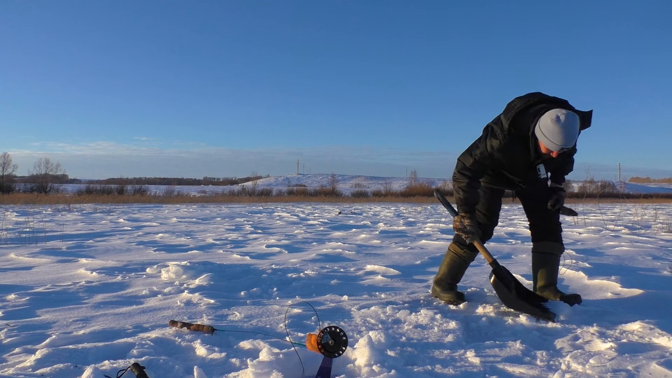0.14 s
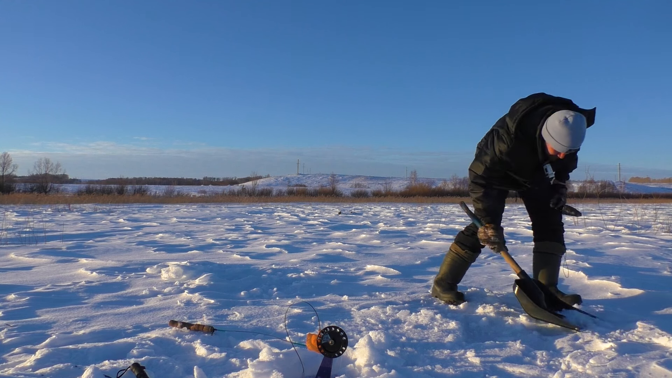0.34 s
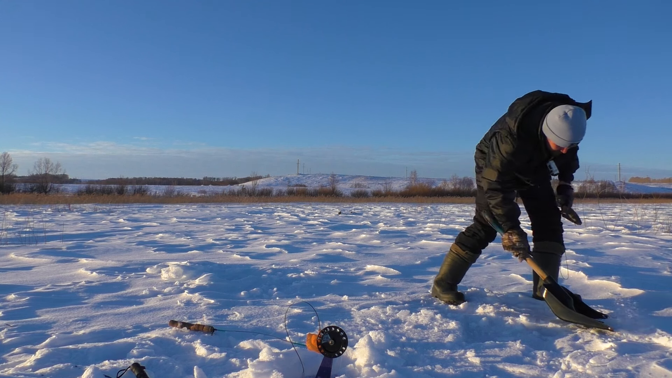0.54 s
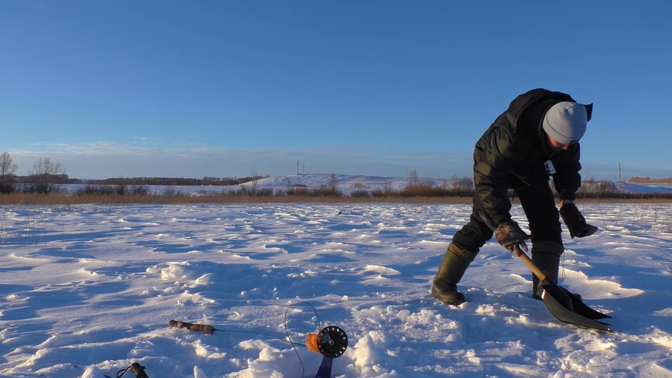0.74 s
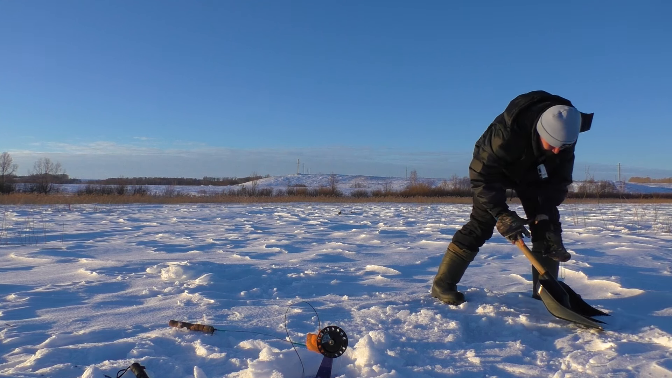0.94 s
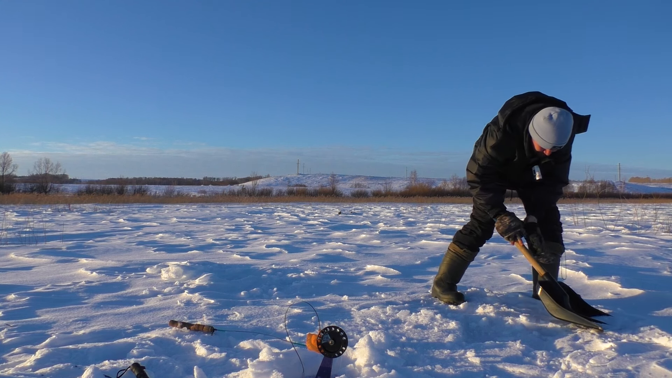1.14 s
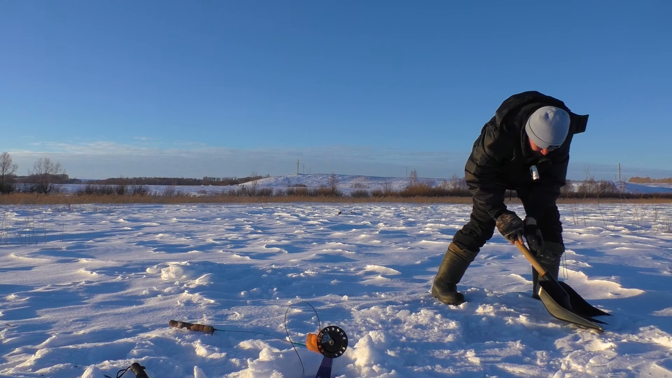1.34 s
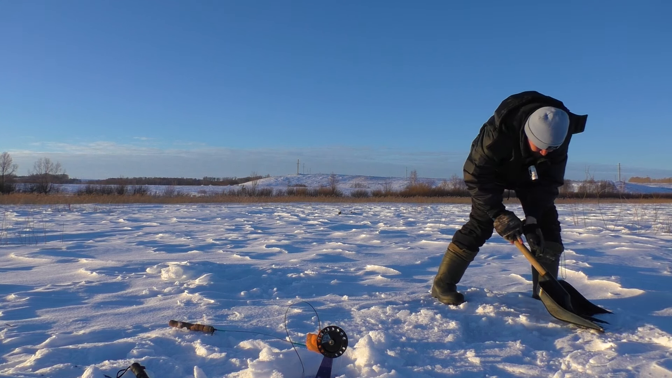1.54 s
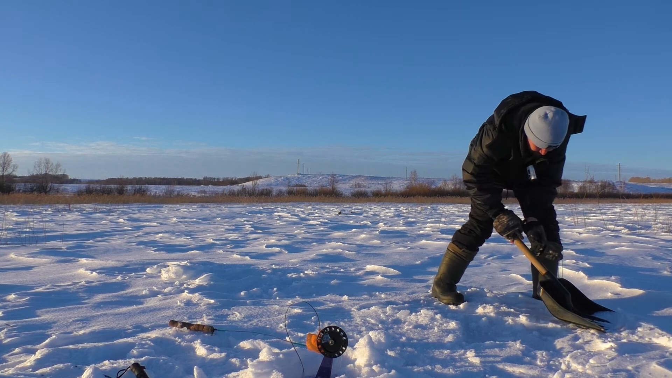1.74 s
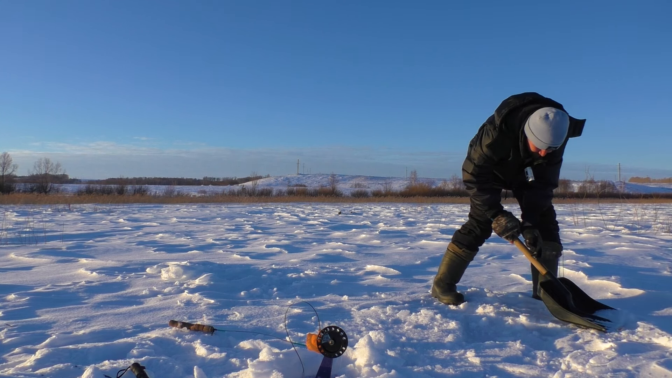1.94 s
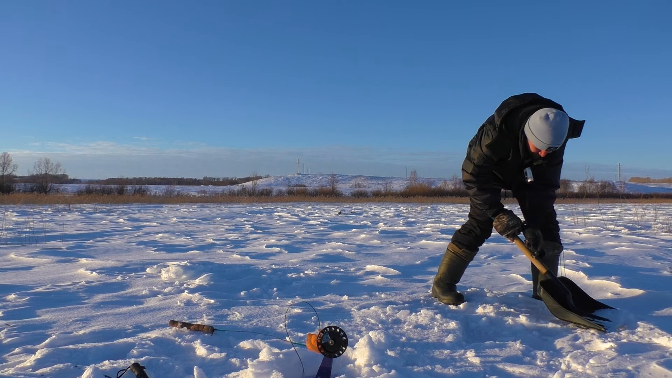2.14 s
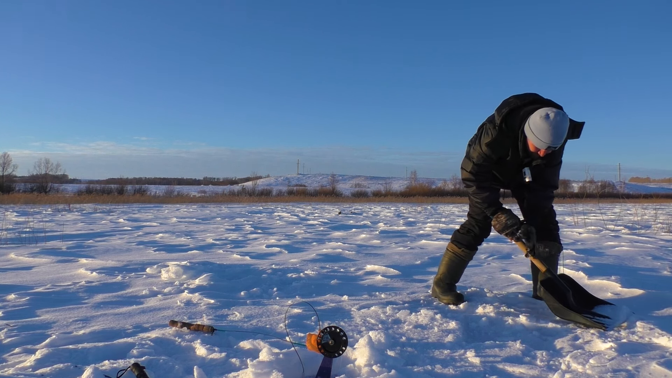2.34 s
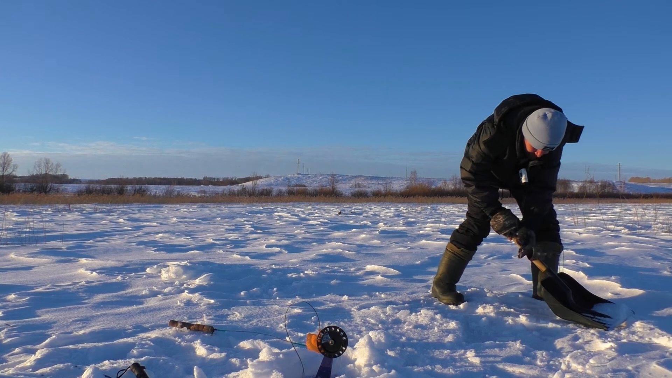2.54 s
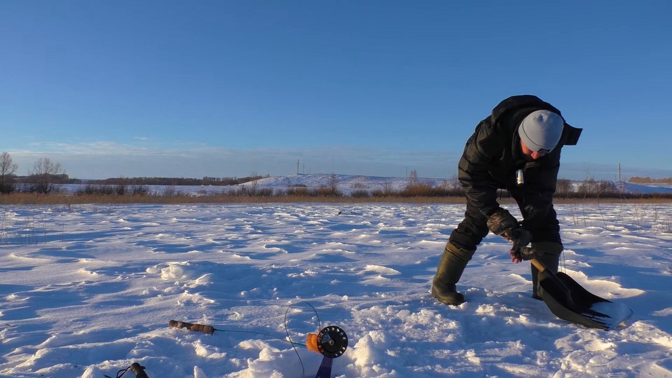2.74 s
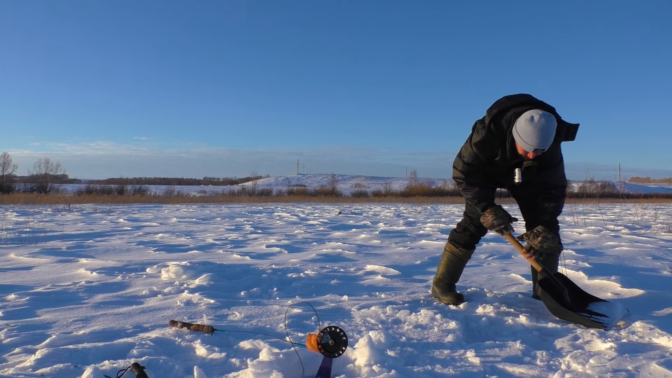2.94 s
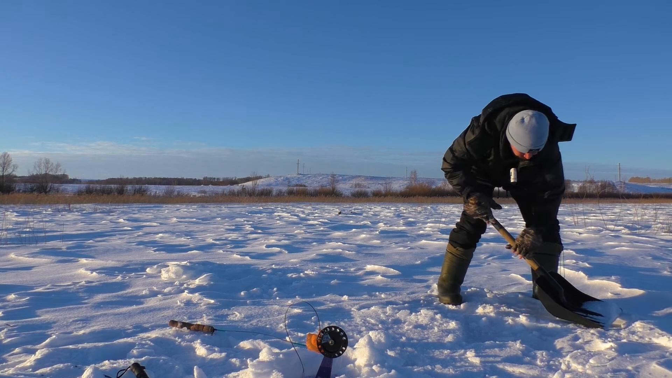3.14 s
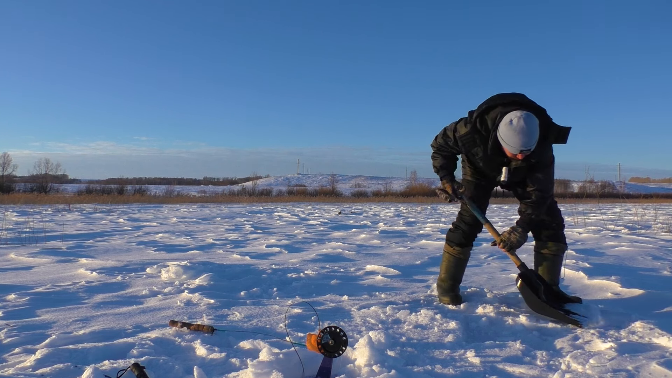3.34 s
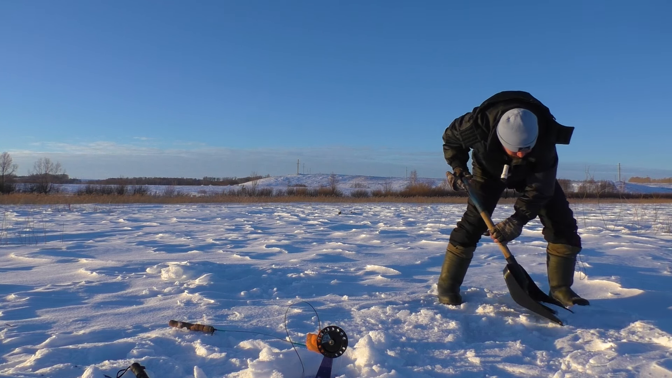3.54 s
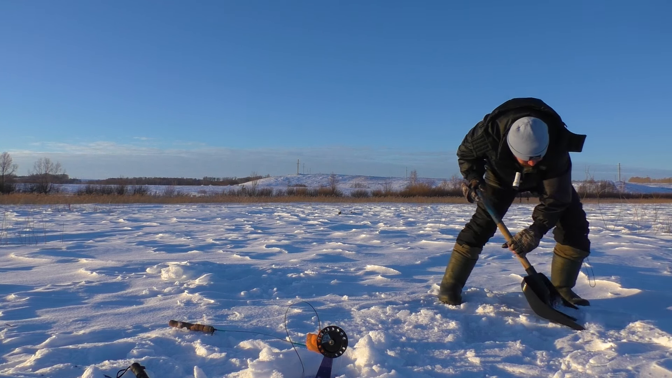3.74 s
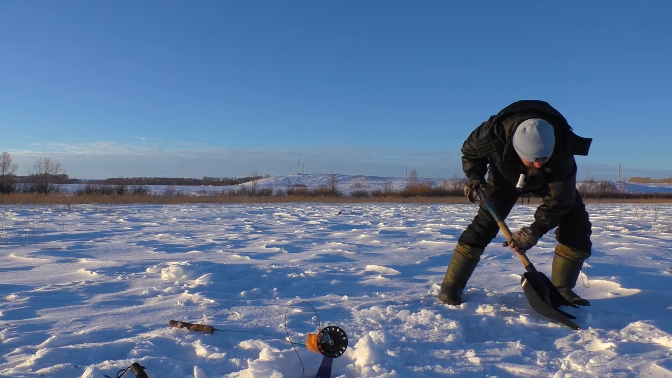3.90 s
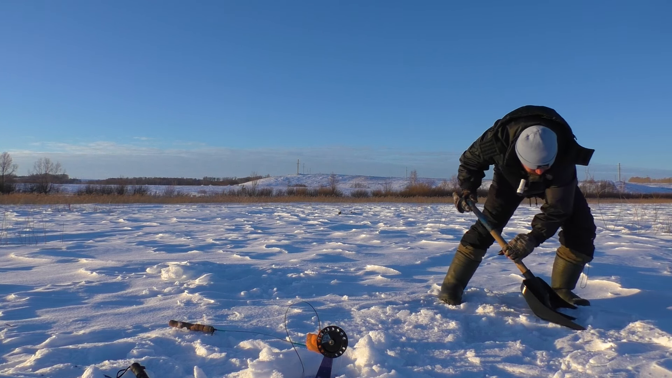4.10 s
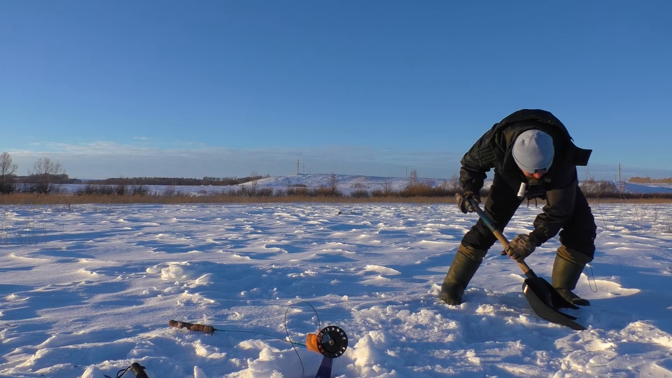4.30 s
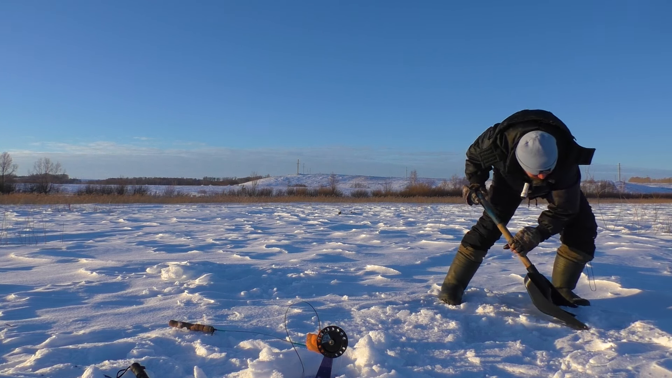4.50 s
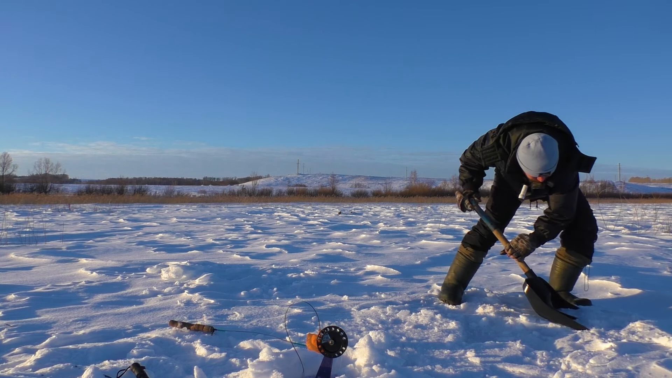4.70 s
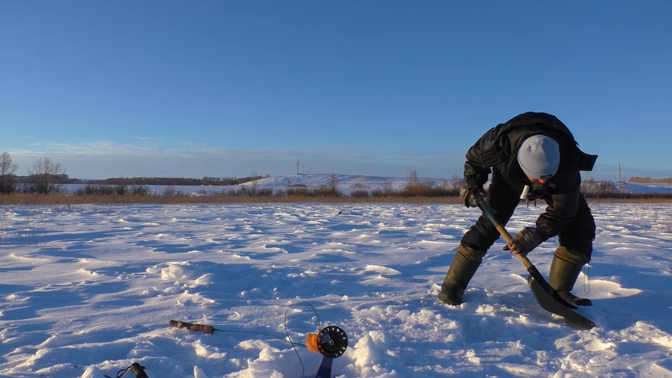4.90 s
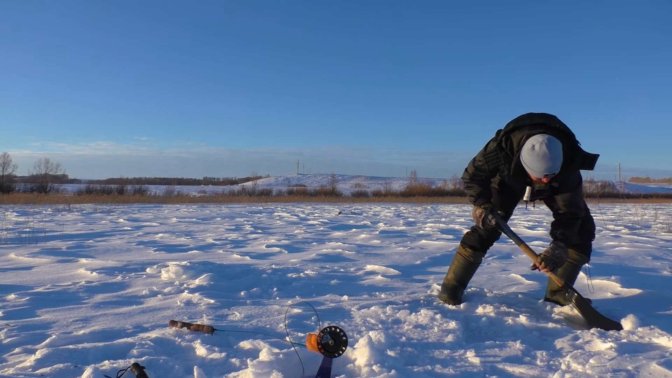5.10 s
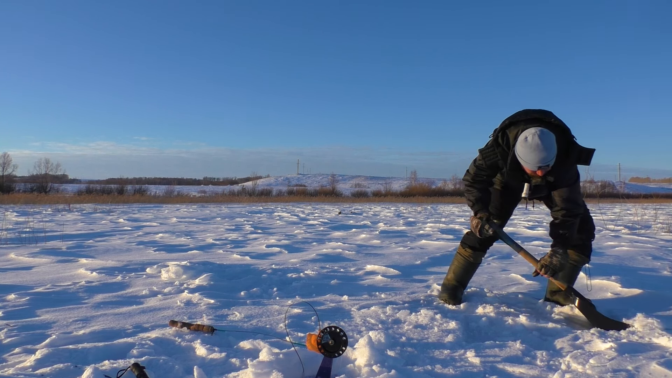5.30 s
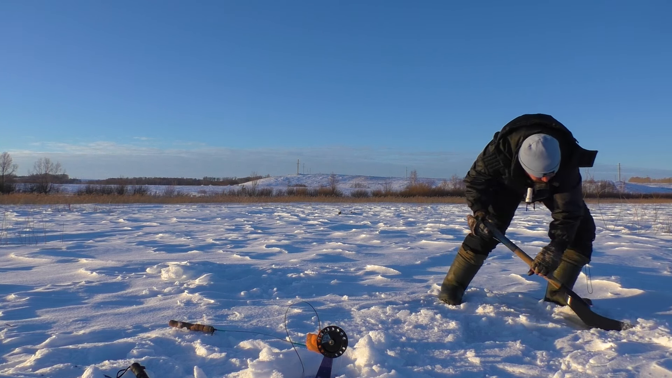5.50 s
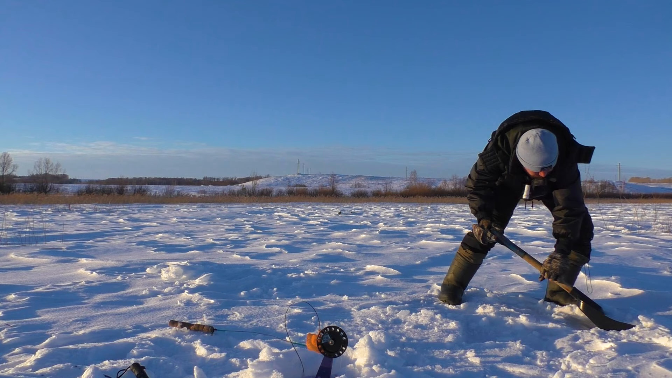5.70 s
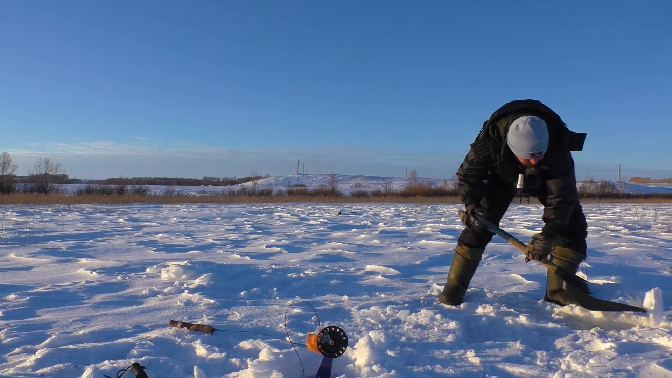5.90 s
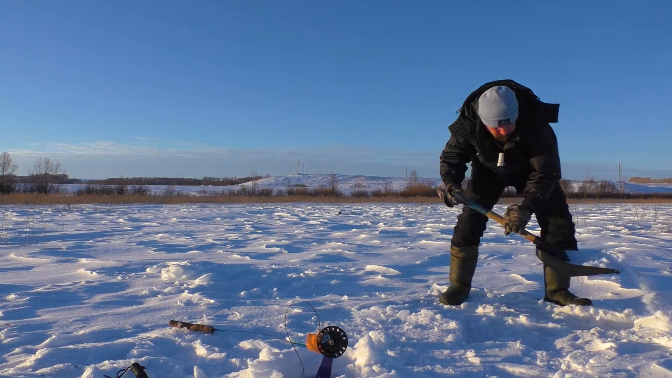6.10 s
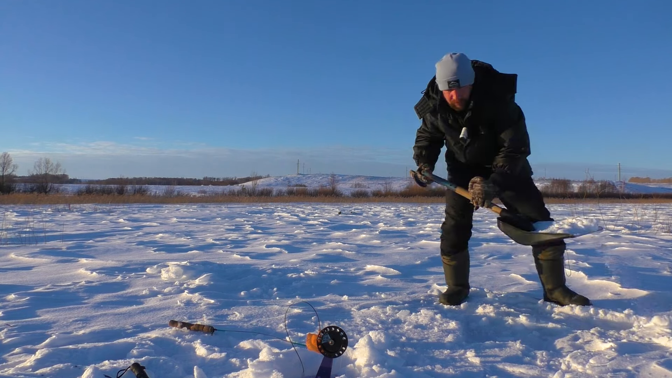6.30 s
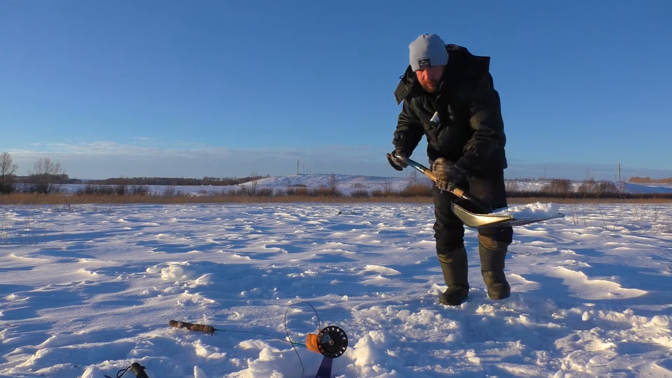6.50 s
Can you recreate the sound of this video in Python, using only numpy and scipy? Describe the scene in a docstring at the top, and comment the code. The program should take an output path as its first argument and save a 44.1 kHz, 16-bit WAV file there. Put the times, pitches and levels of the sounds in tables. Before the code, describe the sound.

A plastic shovel scrapes briefly into crusted snow, its blade booming and juddering. For a few seconds a padded jacket rustles, ice crumbs tick and light wind touches the microphone. Then comes a run of crunching chops and scrapes with hollow knocks, closed by one sharp snap. Packed snow pops dully at the end. It all happens a few steps away on a frozen lake, with no echo.

```python
"""A plastic shovel works crusted snow on a frozen lake, a few steps away, in open air with no echo.
It opens with a short scrape: the crust breaks in clumps of tiny fractures and the blade booms and judders.
For nearly three seconds a padded jacket rustles, ice crumbs tick and light wind touches the microphone.
Then comes a run of chops and scrapes, the scoop flexing and knocking, closed by one sharp snap.
Last, packed snow pops dully under boots or falling clods while the jacket rustles on."""
import sys
import numpy as np
from scipy import signal
from scipy.fft import rfft, irfft
from scipy.io import wavfile
from scipy.ndimage import uniform_filter1d

SR = 44100
rng = np.random.default_rng(int(sys.argv[2]) if len(sys.argv) > 2 else 0)


def persist_wave(psi):
    """Save psi, clipped to +-1, as 16-bit WAV."""
    counts = np.round(np.clip(psi, -1, 1) * 32767).astype(np.int16)
    wavfile.write(sys.argv[1], SR, np.atleast_2d(counts).T)


N = 288987
TIME = np.arange(N) / SR


def gain_of(db):
    """Amplitude ratio of a level in decibels."""
    return 10 ** (np.asarray(db) / 20)


def unit_rms(x):
    """Normalisation to unit mean power."""
    return x / np.sqrt(np.mean(x ** 2) + 1e-20)


def add(mix, start_s, sound):
    """Superposition: a sound joins the mix at its onset."""
    part = mix[max(round(start_s * SR), 0):][:len(sound)]
    part += sound[:len(part)]


def coloured(x, spectrum, size=4096):
    """Minimum-phase filtering by (frequency_hz, level_db) points: causal, so attacks stay sharp."""
    hz, db = np.transpose(spectrum)
    bins_hz = abs(np.fft.fftfreq(size, 1 / SR))
    log_gain = np.log(gain_of(np.interp(np.log(bins_hz + 1), np.log(hz + 1), db)))
    taps = np.fft.ifft(np.exp(np.conj(signal.hilbert(log_gain)))).real[:size // 2]
    return signal.oaconvolve(x, taps)[:len(x)]


def wander(hz):
    """Low-pass noise: a random drift of rms 1, up to about hz."""
    bins_hz = np.fft.rfftfreq(N, 1 / SR)
    return unit_rms(irfft(rfft(rng.standard_normal(N)) / np.sqrt(1 + (bins_hz / hz) ** 4), N))


def swells(table, column, rest_db):
    """Power summation of rounded swells over a resting level; each length is a width at half height."""
    t = TIME[::32]
    steepness = 2.64  # 2 is a bell; higher has a flatter top
    power = gain_of(rest_db) ** 2
    for row in table:
        middle_s, length_s = row[:2]
        halvings = np.minimum(abs(2 * (t - middle_s) / length_s) ** steepness, 20)
        power = power + (gain_of(row[column]) * .5 ** halvings) ** 2
    return np.interp(TIME, t, np.sqrt(power))


def grains(spectrum, per_s, spread_db, clumps, patchy_db):
    """Shot noise as mid and side: random impulses, each with its own size, place and passing colour."""
    # how unlike the two channels hear a grain: frequency_hz, side_to_mid_db
    width = [(25, -28), (70, -7), (250, -22), (600, -13), (1200, -6.5), (4000, -9), (8000, -11.5),
             (12000, -13)]
    sizes = gain_of(spread_db * np.minimum(rng.exponential(1, N), 4))
    impulses = sizes * rng.choice([-1, 1], N) * (rng.random(N) < per_s / SR) * clumps
    frames = signal.stft(np.array([impulses, impulses * rng.standard_normal(N)]), nperseg=256)[2]
    patches = uniform_filter1d(rng.standard_normal(frames.shape[1:]), size=4, axis=0)
    patches = unit_rms(uniform_filter1d(patches, size=7, axis=1))
    mid, side = signal.istft(frames * gain_of(patchy_db * patches), nperseg=256)[1][:, :N]
    mid, side = coloured(mid, spectrum), coloured(coloured(side, spectrum), width)
    return np.array([mid, side]) / np.std(mid)


def open_air():
    """Turbulent pressure: wind buffets the microphone over a faint even hiss."""
    # gusts: middle_s, length_s, level_db
    gusts = [(0.78, 0.085, -33.5), (0.895, 0.055, -27.5), (0.99, 0.07, -37), (1.172, 0.034, -31.5),
             (1.27, 0.098, -32), (1.405, 0.074, -33), (1.83, 0.24, -34), (2.0, 0.075, -32.5),
             (2.26, 0.068, -33.5), (3.38, 0.24, -33), (3.955, 0.06, -27.5), (6.41, 0.18, -36)]
    # spectra of the buffets and the hiss: frequency_hz, level_db
    wind_spectrum = [(10, -8), (32, -1.5), (60, -5), (110, -12), (200, -42), (500, -37), (2000, -68)]
    hiss_spectrum = [(24, -29), (40, -5), (577, -11.5), (778, -11), (1220, -21.5), (1600, -21.5),
                     (2330, -21.5), (6480, -27.5), (9180, -27.5), (15500, -33)]
    strength = swells(gusts, 2, rest_db=-46) * gain_of(3.5 * wander(hz=9.4))
    wind = grains(wind_spectrum, per_s=10000, spread_db=-0.5, clumps=1, patchy_db=-0.5)
    hiss = grains(hiss_spectrum, per_s=30000, spread_db=3, clumps=1, patchy_db=3)
    return wind * strength + gain_of(-43) * hiss


def rustle():
    """Friction and fracture: each movement swishes the jacket, crumbles loose snow and makes ice tick."""
    # movements of the body: middle_s, length_s, swish_db, crumble_db
    movements = [ (0.21, 0.043, -34.5, -31.5), (0.31, 0.13, -34, -32), (0.55, 0.2, -32.5, -40.5),
                 (0.74, 0.19, -39.5, -38.5), (0.96, 0.21, -33.5, -36), (1.13, 0.18, -45.5, -39.5),
                 (1.45, 0.19, -46, -40.5), (1.63, 0.15, -49.5, -44), (1.86, 0.18, -40, -42),
                 (1.97, 0.098, -35, -33.5), (2.11, 0.13, -42.5, -42), (2.33, 0.17, -44, -39),
                 (2.45, 0.078, -42.5, -35), (2.6, 0.3, -42.5, -39.5), (2.68, 0.12, -37, -43),
                 (3.03, 0.24, -42, -38.5), (3.18, 0.21, -35.5, -31.5), (3.31, 0.091, -33.5, -30),
                 (3.44, 0.18, -34, -32), (3.92, 0.047, -34, -26.5), (4.0, 0.11, -35.5, -32.5),
                 (4.49, 0.058, -37.5, -34), (4.6, 0.1, -38, -39.5), (5.51, 0.098, -45, -39),
                 (5.815, 0.071, -42, -38), (5.895, 0.049, -30.5, -36.5), (5.965, 0.079, -37.5, -31.5),
                 (6.06, 0.11, -35.5, -35.5), (6.2, 0.11, -37.5, -37), (6.32, 0.13, -39.5, -33.5),
                 (6.52, 0.15, -44, -39), ]
    # spectra of cloth (also used for the ticks) and loose snow: frequency_hz, level_db
    jacket = [(500, -3.5), (1300, -3.5), (1800, 1), (2300, 2.5), (3000, 1.5), (3900, 1.5), (5500, 0.5),
              (8000, 0), (10500, -4), (13000, -9.5), (16000, -14)]
    loose_snow = [(60, 0.5), (140, -3), (230, 6.5), (400, 1.5), (650, -3.5), (1000, -3), (1600, -8.5),
                  (3500, -33.5)]
    clumps = gain_of(1.1 * wander(hz=59.56))
    swish = grains(jacket, per_s=14000, spread_db=3.5, clumps=clumps, patchy_db=2)
    ticks = grains(jacket, per_s=90, spread_db=3, clumps=1, patchy_db=2.5)
    crumbs = grains(loose_snow, per_s=900, spread_db=2, clumps=clumps, patchy_db=2)
    bright = (swish + gain_of(-11.5) * ticks) * swells(movements, 2, rest_db=-54)
    return bright + crumbs * swells(movements, 3, rest_db=-51)


def chafing():
    """Sliding friction: stiff ribbed cloth drags over itself in brief swells of fine grains."""
    # rubs: middle_s, length_s, level_db
    rubs = [(1.13, 0.085, -40.5), (1.241, 0.021, -35.5), (1.39, 0.16, -42.5), (1.452, 0.047, -38.5),
            (1.486, 0.037, -38.5), (1.51, 0.029, -39), (1.588, 0.1, -43), (1.672, 0.06, -39),
            (2.29, 0.32, -42), (2.44, 0.096, -38)]
    # spectrum of the ribbed cloth: frequency_hz, level_db
    fabric = [(1500, -19), (2280, 3), (3100, -29), (5000, -10.5), (8200, 0), (9700, -5), (11000, -10),
              (15500, -17)]
    envelope = np.zeros(N)
    for middle_s, length_s, db in rubs:
        add(envelope, middle_s - length_s / 2, gain_of(db) * np.hanning(int(length_s * SR)))
    return envelope * grains(fabric, per_s=5900, spread_db=4.5, clumps=1, patchy_db=0.5)


def snow_pops():
    """Heavily damped oscillation: packed snow pops under a boot or a falling clod."""
    # pops: start_s, level_db, pitch_hz
    pops = [(0.787, -25, 476), (1.337, -25.5, 934), (1.472, -18, 476), (3.924, -10.5, 533),
            (5.938, -21.5, 920), (6.235, -15.5, 730), (6.272, -20, 902), (6.29, -14, 525),
            (6.313, -12.5, 730), (6.325, -15, 646), (6.368, -20, 450), (6.385, -18, 460)]
    out, t = np.zeros(N), np.arange(SR // 25) / SR
    for start_s, db, hz in pops:
        pop = np.sin(2 * np.pi * hz * t) * np.exp(-t / 0.0013)
        low_push = 0.32 * np.sin(2 * np.pi * 0.36 * hz * t) * np.exp(-t / 0.0027)
        onset = 1 - np.exp(-t / 0.00018)
        add(out, start_s, gain_of(db) * (pop + low_push) * onset)
    return out


def friction_bands():
    """Noise-driven resonance: sliding snow or cloth sings in a rough band that glides with the load."""
    # resonances: start_s, end_s, first_hz, last_hz, width_hz, level_db
    bands = [(0, 0.077, 2790, 2810, 218, -25.5), (0, 0.08, 945, 968, 120, -34),
             (0, 0.08, 344.5, 330, 60, -30), (0, 0.074, 12500, 12400, 1800, -40),
             (0.448, 0.494, 12400, 12500, 1800, -39), (0.347, 0.414, 5350, 5360, 904, -29),
             (0.349, 0.393, 562, 420, 60, -29.5), (0.398, 0.418, 608, 520, 60, -23),
             (0.416, 0.443, 410, 340, 60, -26), (0.363, 0.423, 1020, 1120, 160, -32.5),
             (0.447, 0.492, 4640, 4610, 350, -27.5), (0.446, 0.487, 6720, 6740, 900, -25),
             (0.477, 0.68, 3960, 3970, 700, -46), (2.635, 2.737, 3730, 3690, 600, -39),
             (3.303, 3.377, 2910, 2550, 900, -36), (3.49, 3.519, 440, 487, 30, -24),
             (3.545, 3.59, 462, 494, 30, -27.5), (3.648, 3.67, 990, 1000, 60, -27),
             (3.651, 3.747, 368, 290, 60, -21.5), (3.672, 3.712, 488, 560, 30, -24.5),
             (3.715, 3.799, 807, 914, 70, -28), (3.637, 3.7, 2550, 2426, 350, -32.5),
             (3.641, 3.786, 3450, 3540, 300, -35), (3.622, 3.685, 5710, 5800, 1000, -31),
             (4.033, 4.111, 125, 248, 55, -26.5), (4.085, 4.201, 2605, 2430, 381, -26),
             (4.09, 4.205, 1130, 1090, 170.8, -25.5), (4.095, 4.186, 638, 614, 69.7, -28.5),
             (4.066, 4.192, 3800, 3650, 500, -28.5), (4.366, 4.427, 880, 900, 119, -34),
             (4.351, 4.46, 3585, 3630, 540, -26.5), (4.373, 4.425, 420, 378, 30, -23),
             (4.752, 4.768, 2770, 2900, 181.6, -29), (5.104, 5.192, 2770, 2780, 150, -27.5),
             (5.202, 5.3, 6900, 7100, 1300, -33), (5.917, 6.125, 992, 1050, 300, -41.5),
             (6.146, 6.246, 946, 965, 330, -40.5), (6.462, 6.553, 1870, 1860, 260, -44.5),
             (6.465, 6.552, 3780, 4300, 450, -44.5)]
    out = np.zeros(N)
    drift = wander(hz=25)
    for start_s, end_s, first_hz, last_hz, width_hz, db in bands:
        count = int((end_s - start_s) * SR)
        pole = np.exp(-2 * np.pi * width_hz / SR)
        noise = rng.standard_normal((2, N // 8))
        quadrature = signal.lfilter([1], [1, -2 * pole, pole * pole], noise)[:, -count:]
        quadrature /= np.hypot(*quadrature) ** 0.26  # friction holds the strength fairly even
        waver = 1 + 0.0117 * np.roll(drift, -int(start_s * SR))[:count]
        phase = 2 * np.pi * np.cumsum(np.linspace(first_hz, last_hz, count) * waver) / SR
        tone = quadrature[0] * np.cos(phase) + quadrature[1] * np.sin(phase)
        add(out, start_s, gain_of(db) * unit_rms(tone * signal.windows.tukey(count, .5)))
    return out


def blade_ring(damping, detune, soft_hz):
    """Modal decay: the modes shift with the point of contact, and a soft blow misses the high ones."""
    # modes of the blade: pitch_hz, level_db, t60_s (at a damping of 1)
    modes = [(329, 8.5, 0.033), (946, 12.5, 0.01), (1510, 3.5, 0.028), (2360, 8.5, 0.015),
             (2900, 1, 0.0082), (3600, 10, 0.0039), (5610, 8, 0.032), (6900, 7, 0.026), (8900, 9, .02)]
    t = np.arange(SR // 16) / SR
    hz, db, t60_s = np.transpose(modes)[:, :, None]
    hz = hz * (1 + detune * rng.standard_normal(hz.shape))
    strength = gain_of(db) / (1 + (hz / soft_hz) ** 4) * rng.choice([-1, 1], hz.shape)
    decay = np.exp(-np.log(1000) * damping * t / t60_s)
    sound = (strength * decay * np.sin(2 * np.pi * hz * t)).sum(0)
    return sound / abs(sound).max()


def judder():
    """Stick-slip motion: uneven slips ring the blade at a gliding rate."""
    # runs of slips: start_s, end_s, peak_db, first_rate_hz, last_rate_hz
    runs = [(0.0, 0.077, -12, 167, 178), (0.123, 0.139, -8.5, 232, 186), (0.382, 0.4, -13.5, 103, 140),
            (4.1, 4.189, -15.5, 193, 100), (4.722, 4.736, -13.5, 220, 150), (4.803, 4.823, -25, 220, 81),
            (5.093, 5.176, -10.5, 217, 150)]
    out = np.zeros(N)
    for start_s, end_s, db, first_hz, last_hz in runs:
        cycles = np.cumsum(np.linspace(first_hz, last_hz, int((end_s - start_s) * SR))) / SR
        slips_s = np.flatnonzero(np.diff(np.floor(cycles), prepend=-1)) / SR
        for slip_s, (late, size) in zip(slips_s, rng.standard_normal((len(slips_s), 2))):
            ring = blade_ring(damping=1.3, detune=0.064, soft_hz=4240)
            add(out, start_s + slip_s + 0.00077 * late, gain_of(db + 0.59 * size) * ring)
    return out


def snaps():
    """Brittle fracture: a hard crumb cracks, knocks and rings the blade; a dull crack rings it dully."""
    # cracks: start_s, peak_db, treble_db, knock_db (the last two shape the spectrum)
    cracks = [(0.075, -8.5, 12, -25), (0.108, -8, -8, 6), (0.85, -20, -13, -4), (1.172, -23, 4, -24),
              (1.275, -23.5, -19, -10), (1.7235, -22.5, 6, -21), (1.7647, -20, 2, -28),
              (2.278, -20.5, -15, -15), (2.492, -14.5, -30, -5), (3.062, -16, -25, -20),
              (3.069, -13.5, 10, -14), (3.563, -8, -14, -12), (3.853, -10.5, -38, 19),
              (3.875, -23, -6, -26), (3.89, -16, -10, -31), (3.939, -9, 4, -26), (4.183, -6, -2, -13),
              (4.193, -7.5, -6, 2), (4.205, -5.5, -3, -4), (4.668, -6, -6, -7), (4.736, -9.5, -14, 4),
              (4.754, -6, 1, -25), (4.799, -6, -8, -4), (4.8161, -12, -6, -21), (4.8191, -5.5, -18, -5.5),
              (4.828, -8, -8, -24), (4.984, -19.5, -34, -16), (5.335, -15, -10, -12),
              (5.354, -8.5, -14, -7), (5.368, -13.5, -34, -16), (5.4827, -14.5, -12, -22),
              (5.8335, -1, -12, -16.5), (6.3468, -13.5, -28, -8)]
    out, t = np.zeros(N), np.arange(SR // 16) / SR
    for start_s, db, treble_db, knock_db in cracks:
        burst = rng.standard_normal(len(t)) * np.exp(-t / 0.0011)
        burst[0] += 3  # the first break is the sharpest
        lows = [(100, knock_db), (350, knock_db + 12.5), (700, knock_db + 6), (1400, knock_db + 5.5)]
        highs = [(2200, -4), (4200, -4.5), (8000, treble_db), (15000, treble_db - 21)]
        crack = coloured(burst, lows + highs)
        ring = blade_ring(damping=0.6, detune=0.01, soft_hz=12000 * gain_of(0.14 * treble_db))
        sound = crack / abs(crack).max() + gain_of(-7 + .5 * knock_db) * ring
        add(out, start_s, gain_of(db) * sound / abs(sound).max())
    return out


def thumps():
    """Damped flexure: as blade or boot breaks through, the snow-loaded scoop bends and its hollow rings."""
    # blows: start_s, level_db, pitch_hz, hollow_relative_db
    blows = [(0.107, -15.5, 362, 4), (0.131, -12, 258, 5), (0.3923, -11, 343, -11),
             (0.4122, -7.5, 308, -14), (2.233, -23, 140, -30), (3.491, -10, 323, -8), (3.504, -9, 315, -5),
             (3.62, -9.5, 198, -9), (3.727, -10, 292, -5), (3.785, -13, 264, -7), (3.843, -16, 203, -10),
             (4.087, -10, 186.3, -14), (4.242, -7.5, 260, -11), (4.25, -21, 316, -6),
             (4.283, -10.5, 330, -13), (4.366, -16, 255, 1), (4.385, -11.5, 246, -2), (4.402, -12, 253, 0),
             (4.638, -7.5, 196, -19), (4.65, -16, 260, -12), (4.731, -10, 224, -15), (4.754, -14, 268, -21),
             (4.801, -12, 321, -4), (4.82, -24, 267, 0), (5.089, -2.5, 230.7, -22), (5.109, -11.5, 303, 3),
             (5.13, -5, 267.5, -20), (5.301, -22, 330, -14), (5.346, -21, 410, -10), (5.408, -22, 260, 5),
             (5.835, -21, 279, -20), (6.319, -21, 288, -17)]
    hollow_hz, hollow_decay_s = 894, 0.0035
    out, t = np.zeros(N), np.arange(SR // 10) / SR
    for start_s, db, hz, hollow_db in blows:
        overtone_shift, hollow_shift = rng.uniform(-1.04, 1, 2)
        overtone_hz = hz * (1.615 + 0.13 * overtone_shift)
        flex = (np.sin(2 * np.pi * hz * t) + 0.37 * np.sin(2 * np.pi * overtone_hz * t)) * np.exp(-t / 0.008)
        hollow = np.sin(2 * np.pi * hollow_hz * (1 + 0.078 * hollow_shift) * t)
        hollow *= gain_of(hollow_db) * np.exp(-t / hollow_decay_s)
        onset = 1 - np.exp(-t / 0.0014)
        add(out, start_s, gain_of(db) * (flex + hollow) * onset)
    return out


def push_envelopes():
    """Loading and release: crunch, powder and boom build, hold and let go with each push of the blade."""
    # pushes: start_s, attack_s, length_s, release_s, crunch_db, boom_db, powder_relative_db
    pushes = [ (0.0, 0.0011, 0.056, 0.04, -21.5, -21, -6), (0.097, 0.03, 0.038, 0.035, -25.5, -22, -8.5),
              (0.328, 0.028, 0.052, 0.007, -25, -23, -3.5), (0.386, 0.0077, 0.021, 0.0053, -26, -15, -7),
              (0.44, 0.019, 0.031, 0.035, -21.5, -18.5, -2), (3.25, 0.086, 0.1, 0.026, -29, -47, -26),
              (3.477, 0.0083, 0.036, 0.033, -30, -23.5, -5), (3.534, 0.018, 0.017, 0.068, -24.5, -22.5, -5),
              (3.583, 0.067, 0.091, 0.04, -23, -27.5, -7), (3.679, 0.019, 0.057, 0.03, -26, -22, -3),
              (3.722, 0.018, 0.051, 0.024, -20, -19, -4), (3.769, 0.008, 0.025, 0.017, -27, -20.5, -16),
              (3.835, 0.012, 0.018, 0.03, -26, -21.5, -10), (4.035, 0.039, 0.099, 0.023, -22.5, -24, -3.5),
              (4.09, 0.01, 0.11, 0.012, -24, -29.5, -5.5), (4.205, 0.034, 0.046, 0.025, -27, -20, -6.5),
              (4.248, 0.022, 0.035, 0.073, -25.5, -24.5, -6.5), (4.267, 0.15, 0.17, 0.034, -23.5, -33, -3),
              (4.357, 0.0091, 0.055, 0.041, -36, -24, -14), (4.628, 0.0081, 0.024, 0.033, -23, -25.5, -6),
              (4.669, 0.014, 0.07, 0.011, -28.5, -28, -5), (4.745, 0.007, 0.019, 0.0076, -29, -32, -0.5),
              (4.771, 0.0098, 0.04, 0.004, -31, -35, -10), (4.811, 0.003, 0.018, 0.0088, -28.5, -27, -9),
              (4.834, 0.032, 0.062, 0.017, -32, -36.5, -3.5),
              (5.005, 0.045, 0.082, 0.045, -27.5, -28, -2.5),
              (5.078, 0.007, 0.072, 0.057, -28.5, -18.5, -4.5),
              (5.147, 0.054, 0.088, 0.033, -21, -20.5, -6), (5.234, 0.016, 0.07, 0.018, -29, -30.5, -10.5),
              (5.366, 0.011, 0.041, 0.071, -29.5, -31, -8.5), (5.416, 0.18, 0.23, 0.045, -26.5, -32, -1),
              (5.603, 0.053, 0.1, 0.028, -27, -24, -8.5), ]
    ramp_db = 15.5  # climb over one attack time, drop over one release time
    power = np.zeros((3, N))
    for start_s, attack_s, length_s, release_s, crunch_db, boom_db, powder_db in pushes:
        building = np.maximum(1 - (TIME - start_s) / attack_s, 0)
        easing = np.maximum(TIME - start_s - length_s, 0) / release_s
        shape = gain_of(-ramp_db * np.minimum(building + easing, 10))
        power += np.outer(gain_of([crunch_db, crunch_db + powder_db, boom_db]), shape) ** 2
    return np.sqrt(power)


def collapse_envelopes(decay_s=0.0047):
    """Sudden failure: a slab gives way, and crunch and powder jump up and decay exponentially."""
    # breaking slabs: start_s, crunch_db, powder_db
    slabs = [(0.1251, -25, -42), (0.4555, -17, -32), (1.237, -39, -48), (3.489, -21.5, -22.5),
             (3.548, -26, -21), (3.844, -38, -40), (4.3646, -23, -33), (4.6355, -23, -17),
             (4.644, -17.5, -17.5), (4.6599, -19, -24), (4.698, -19, -27), (4.7085, -15.5, -25),
             (4.722, -15, -23), (4.799, -30, -34), (4.821, -24, -31), (4.829, -22, -34)]
    crunch, powder = np.zeros((2, N))
    decay = np.exp(-TIME[:SR // 16] / decay_s)
    for start_s, crunch_db, powder_db in slabs:
        add(crunch, start_s, gain_of(crunch_db) * decay)
        add(powder, start_s, gain_of(powder_db) * decay)
    return crunch, powder


def scraping():
    """Forced vibration: the crust fails in clumps of fractures that shake the blade and throw off powder."""
    # spectra of crust, powder and the buried and free blade: frequency_hz, level_db
    crust = [(250, -14), (620, -12), (760, 2), (950, 0), (1250, -3), (1500, -1), (1800, -4), (2450, -1),
             (3050, -0.5), (3600, 0.5), (4900, -3), (6500, -3.5), (8000, -10.5), (10000, -45), (15000, -32)]
    fine_snow = [(3500, -30), (6500, -2), (8500, 0), (10500, -4), (12500, -11), (16000, -18.5)]
    blade_buried = [(50, -53), (90, -22), (130, -4), (175, 0), (250, 3), (340, -2.5), (480, -1), (660, -7),
                    (920, -10), (1200, -25), (1600, -15), (4000, -70)]
    blade_free = [(50, -54), (150, -13.5), (240, -10), (330, 4), (430, -4.5), (540, -4), (700, -24),
                  (1000, -10), (1600, -22), (4000, -69)]
    # how deep the blade sits; packed snow lowers its boom: time_s, depth_fraction
    depths = [(0, 0.33), (.45, 0.06), (3.5, 0.67), (4.1, 0.82), (5.2, 0.9), (5.7, 0.54)]
    clumps = gain_of(1.22 * wander(hz=166))
    fine = grains(crust, per_s=7000, spread_db=2, clumps=clumps, patchy_db=2)
    chunks = grains(crust, per_s=420, spread_db=1, clumps=clumps, patchy_db=4.5)
    chunk_gain = gain_of(-3)
    crunch = (fine + chunk_gain * chunks) / np.hypot(1, chunk_gain)
    powder = grains(fine_snow, per_s=11000, spread_db=2, clumps=clumps, patchy_db=2.5)
    buried, free = (grains(blade, per_s=2500, spread_db=0.5, clumps=np.sqrt(clumps), patchy_db=3)
                    for blade in (blade_buried, blade_free))
    depth = np.interp(TIME, *np.transpose(depths))
    boom = np.sqrt(depth) * buried + np.sqrt(1 - depth) * free
    push_crunch, push_powder, push_boom = push_envelopes()
    slab_crunch, slab_powder = collapse_envelopes()
    crunch *= np.hypot(push_crunch, slab_crunch)
    powder *= np.hypot(push_powder, slab_powder)
    return crunch + powder + boom * push_boom


def scene():
    """Superposition and directivity: the sources add, and the blade beams treble to one side."""
    # which way the treble is thrown: time_s, left_minus_right_db
    facing = [(0, -3.5), (.42, -4.5), (.65, 0.5), (2.9, 2), (3.33, -1.5), (3.6, 3), (4.8, 4), (5.7, 5),
              (5.95, 1), (6.55, 0.5)]
    mid, side = scraping() + rustle() + chafing() + open_air()
    mid = mid + friction_bands() + judder() + snaps() + thumps() + snow_pops()
    treble = signal.sosfiltfilt(signal.butter(2, 1700, "high", fs=SR, output="sos"), mid)
    ratio = gain_of(np.interp(TIME, *np.transpose(facing)))
    side = side + treble * (ratio - 1) / (ratio + 1)
    return np.array([mid + side, mid - side])


def record(dry):
    """Path difference and saturation: the left leads slightly, peaks round off, the band is limited."""
    lead_s, ceiling, edge_hz = 1.3e-5, .78, 16000
    hz = np.fft.rfftfreq(N, 1 / SR)
    left_response = gain_of(-.2) * np.exp(1j * np.pi * hz * lead_s)
    heard = irfft(rfft(dry) * np.array([left_response, 1 / left_response]), N)
    heard = heard / (1 + (heard / ceiling) ** 4) ** .25
    low_pass = signal.firwin(511, edge_hz, window=("kaiser", 9), fs=SR)
    return signal.oaconvolve(heard, low_pass[None], "same")


dry = scene()
out = record(dry)
persist_wave(out)
```